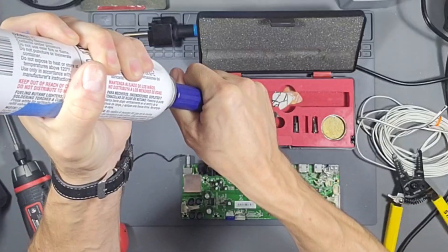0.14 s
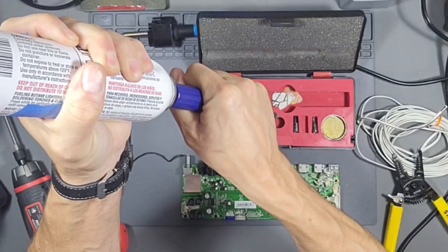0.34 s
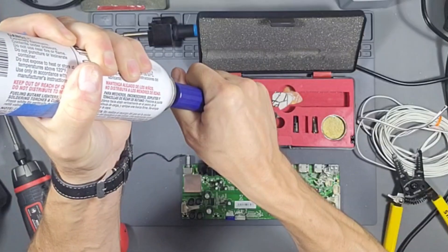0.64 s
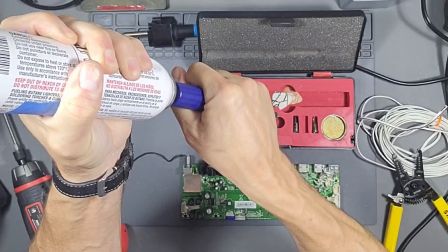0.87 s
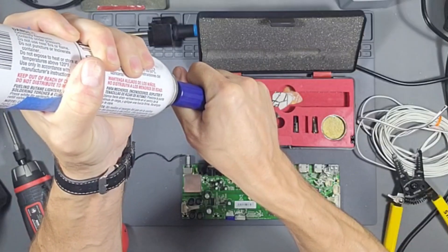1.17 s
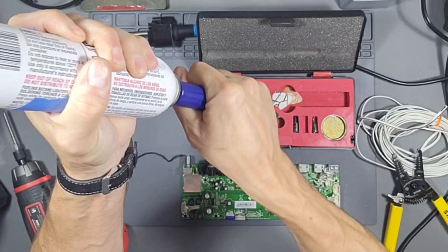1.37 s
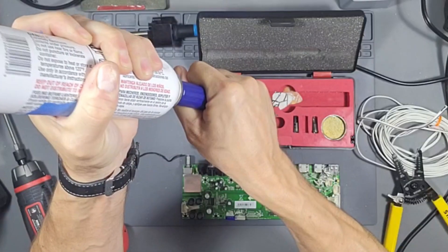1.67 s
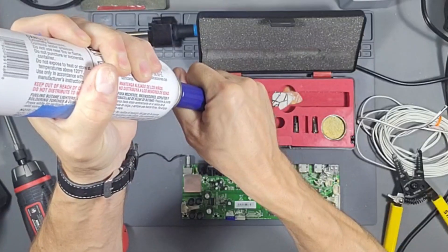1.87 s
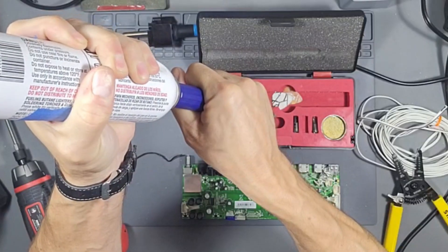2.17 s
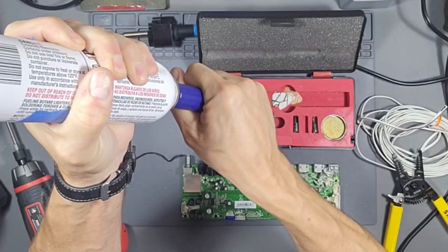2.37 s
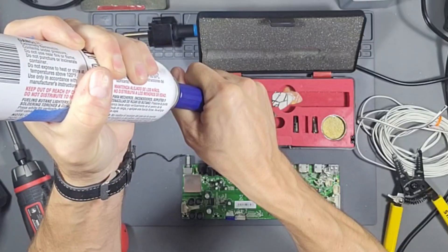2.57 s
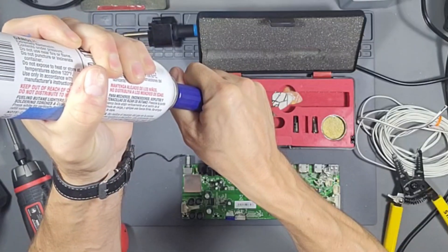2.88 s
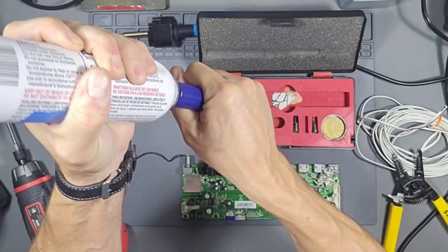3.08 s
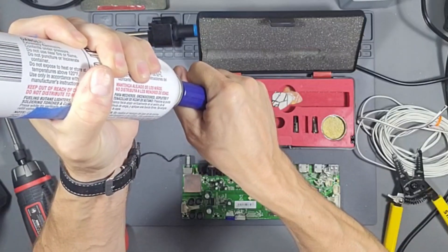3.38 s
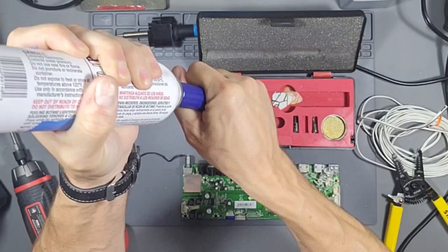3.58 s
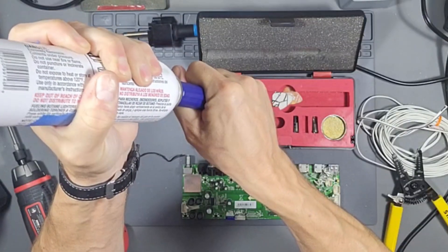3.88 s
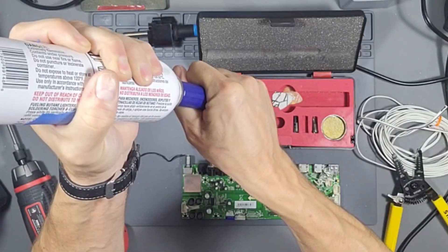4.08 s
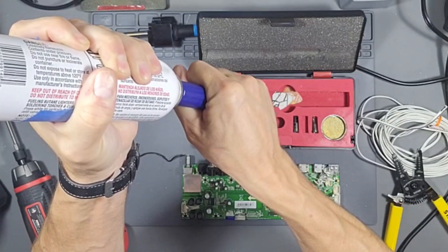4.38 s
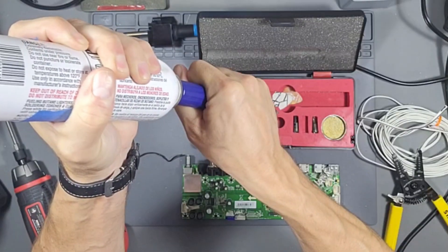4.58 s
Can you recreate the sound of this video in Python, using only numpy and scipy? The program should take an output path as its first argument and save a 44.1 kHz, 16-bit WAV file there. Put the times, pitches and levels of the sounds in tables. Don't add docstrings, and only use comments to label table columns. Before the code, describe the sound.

A bright, sizzling jet of gas fills the whole stretch, concentrated very high with little body, wavering in tone as the seal leaks more or less. Under it, faint low bumps from handling arrive irregularly, mostly after about two seconds, with another near the end. The indoor space is quiet and close with barely any echo, a weak low hum underneath, picked up in stereo by a nearby phone.

```python
import sys
import numpy as np
from scipy import signal
from scipy.fft import rfft, irfft, next_fast_len
from scipy.io import wavfile
from scipy.ndimage import uniform_filter1d, minimum_filter1d

SR = 44100
rng = np.random.default_rng(int(sys.argv[2]) if len(sys.argv) > 2 else 0)


def amplitude_ratio(level_db):
    exponent = np.asarray(level_db, float) / 20
    return 10 ** exponent


def master_out(mix):
    frames = np.transpose(np.atleast_2d(mix))
    ceiling = np.clip(frames, -1, 1)
    pcm = np.round(ceiling * 32767).astype(np.int16)
    wavfile.write(sys.argv[1], SR, pcm)


N = 209254
T = np.arange(N) / SR


def evened(x):
    return x / np.sqrt(np.mean(x ** 2) + 1e-20)


def read(points, hz):
    f, value = np.transpose(points)
    return np.interp(np.log(hz + 1), np.log(f + 1), value)


def humps(modes, hz):
    return np.sqrt(sum(amplitude_ratio(db) ** 2 / (1 + (2 * (hz - f) / width) ** 2) ** 2 for f, width, db in modes))


def patches(shape, bins, frames):
    field = uniform_filter1d(rng.standard_normal(shape), size=bins, axis=-2)
    return evened(uniform_filter1d(field, size=frames, axis=-1))


def ports(z, other, alike, lead=0):
    alike = np.clip(alike, 0, 1)
    left = alike * z * np.exp(1j * lead) + np.sqrt(1 - alike ** 2) * other
    return np.array([left, z])


def jet():
    # (time [s], flow [dB], leak past the seal [dB])
    flow_points = [(0, -3, 0), (0.06, -1.5, -1.5), (0.16, 0.5, 3), (0.45, 0.3, 1.5), (0.54, -1.5, 4),
                   (0.6, -1, 5.5), (0.85, 1, 5.5), (1.35, 2.5, 2.5), (1.385, 0.5, 1.3), (1.9, 0.7, -0.7),
                   (2.25, -0.5, 0), (2.9, -0.3, -0.4), (3.01, .3, 1.5), (3.1, -0.1, -0.5), (3.5, 0.9, -0.3),
                   (3.6, 0.4, -2.5), (4.2, 0.4, -2), (4.745, -0.2, -1.5)]
    # (low edge [Hz], high edge [Hz])
    bands_hz = [(8400, 10000), (10000, 13200), (13200, 15700), (1500, 8000)]
    # (level [dB], share of flow swings [dB/dB], share of leak swings [dB/dB])
    parts = [
        (-33, 1.5, 0.014),
        (-37.5, 0.49, 0.95),
        (-50.5, 0.35, 0.73),
        (-46.5, 0.31, 0.55),
    ]
    # (centre [Hz], width [Hz], level [dB])
    left_modes = [(1900, 900, -33), (2680, 900, -38), (3050, 250, -31), (3440, 900, -32), (4080, 330, -25),
                  (4430, 200, -21), (4740, 260, -20), (5350, 900, -24), (6080, 130, -28), (6440, 570, -28),
                  (7300, 460, -27), (8010, 190, -34), (8780, 420, -16), (9080, 310, -6), (9440, 380, -6),
                  (9750, 130, -6), (10070, 370, -4), (10330, 150, -7), (10640, 250, -9), (10920, 380, -10),
                  (11470, 480, -10), (11760, 150, -7), (12230, 900, -12), (12550, 120, -6),
                  (12630, 900, -13), (13530, 520, -23), (13970, 900, -25), (14680, 900, -27),
                  (15220, 320, -25), (15650, 530, -20)]
    # (centre [Hz], width [Hz], level [dB])
    right_modes = [(1230, 150, -33), (1620, 220, -30), (2150, 880, -24), (3030, 270, -30), (3420, 270, -32),
                   (3670, 160, -32), (4360, 730, -23), (4840, 210, -21), (5260, 720, -21), (6170, 900, -20),
                   (7300, 760, -15), (7950, 220, -19), (8300, 160, -15), (8750, 250, 1), (8940, 140, -2),
                   (9110, 150, 1), (9340, 470, 1), (9900, 400, -4), (10290, 220, -9), (10870, 680, -11),
                   (11590, 360, -12), (12010, 400, -14), (12310, 280, -15), (12570, 140, -17),
                   (12840, 490, -19), (13410, 750, -17), (14280, 470, -20), (14760, 260, -23),
                   (15190, 680, -27), (15610, 440, -23)]
    # (centre [Hz], width [Hz], level [dB])
    whistles = [(1960, 28, -18.5), (2150, 31, -20), (9400, 33, -47), (10700, 33, -10.5), (4400, 98, -21)]
    # (centre [Hz], width [Hz], level [dB])
    skirt = [(724, 430, -44), (1130, 92, -58)]
    # (frequency [Hz], phase [rad])
    lead_points = [(900, 0.4), (2000, 1.08), (2650, 1.73), (4000, -0.35), (4450, 1.6), (4850, -2.5),
                   (5200, -0.04), (7000, 1.3), (9000, -0.35), (10100, -2.5), (10850, 1.26), (11300, 3),
                   (13000, 4), (14500, 7)]
    # (frequency [Hz], share [0-1])
    alike_points = [(1000, .6), (2100, .8), (3500, .5), (5300, .8), (7800, .55), (8900, .92), (10500, .75),
                    (12000, .85), (15500, .6)]
    # (centre [Hz], width [Hz], lift [dB], end [s])
    grip = (10900, 220, 2.34, 3.1)
    sway_db_per_db = -0.25
    climb_db_per_khz_db = 0.77
    turn_rad_per_db = 0.12

    noise = rng.standard_normal((2, N + 1024))
    z, other = signal.stft(noise, SR, nperseg=1024, noverlap=768)[2]
    hz = np.fft.rfftfreq(1024, 1 / SR)
    t = np.arange(z.shape[1]) * 256 / SR
    s, flow_db, leak_db = np.transpose(flow_points)
    flow, leak = np.interp(t, s, flow_db), np.interp(t, s, leak_db)
    paths = np.array([humps(left_modes + skirt, hz), humps(right_modes + skirt + whistles, hz)])

    power = (paths ** 2).mean(0)
    share_db = [10 * np.log10(power[(hz > lo) & (hz < hi)].sum()) for lo, hi in bands_hz]
    swell = np.array([db + a * flow + b * leak - share for (db, a, b), share in zip(parts, share_db)])
    roar = swell[3].mean() + 1.11 * (swell[1] - swell[1].mean()) - 0.3
    swell = np.vstack([swell, roar])
    part = np.array([4, 3, 0, 1, 2])[np.searchsorted([2700, 8200, 10000, 13200], hz)]
    field = uniform_filter1d(swell[part], size=9, axis=0)

    grip_hz, grip_width_hz, grip_db, grip_end_s = grip
    grip_gain = grip_db / (1 + (2 * (hz - grip_hz) / grip_width_hz) ** 4)
    field += grip_gain[:, None] * np.sign(grip_end_s - t)
    slope_khz = np.clip((hz - 9300) / 1000, -0.8, 0.6) * (hz > 8200) * (hz < 10000)
    field += climb_db_per_khz_db * slope_khz[:, None] * leak
    tilt = sway_db_per_db * leak / 2 * np.array([1, -1])[:, None, None] * (hz > 8200)[:, None]

    drift = 1.0 * patches((2,) + z.shape, 2, 120)
    drift = drift + 2.2 * patches(z.shape, 3, 200) * (hz > 7000)[:, None]
    drift = drift + 1.3 * patches(z.shape, 14, 6)
    flicker = 0.14 * patches((1, len(t)), 1, 5)

    lead = read(lead_points, hz)[:, None] + turn_rad_per_db * leak * (hz > 11200)[:, None]
    z = ports(z, other, 0.84 * read(alike_points, hz)[:, None], lead) * paths[:, :, None]
    z = z * amplitude_ratio(field + tilt + drift + flicker + 26.5)
    return echoed(signal.istft(z, nperseg=1024, noverlap=768)[1][:, :N])


def echoed(x, t60_s=0.12, wet_db=-14):
    t = np.arange(SR // 8) / SR
    tail = rng.standard_normal((2, len(t))) * amplitude_ratio(-60 * t / t60_s) * (t > 0.003)
    tail *= amplitude_ratio(wet_db) / np.linalg.norm(tail, axis=1, keepdims=True)
    tail[:, 0] = 1
    return signal.fftconvolve(x, tail, axes=1)[:, :N]


def coloured(x, gain):
    size = next_fast_len(N)
    hz = np.fft.rfftfreq(size, 1 / SR)
    return evened(irfft(rfft(x, size) * gain(hz), size)[:N])


def jolts():
    # (start [s], shudder length [s], knock [dB], rattle [dB], thud [dB])
    events = [(-0.02, 0.036, -62, -57.5, -51.5), (1.205, 0.17, -64.5, -61.5, -58),
              (1.819, 0.086, -52.5, -68, -47.5), (1.912, .07, -68, -72, -54),
              (2.255, 0.072, -53.5, -63.5, -57), (2.342, 0.055, -63, -67, -50.5),
              (2.666, 0.11, -55, -71, -48.5), (2.969, 0.21, -51.5, -67, -41.5),
              (3.261, 0.1, -50.5, -63.5, -43), (3.348, 0.061, -55, -76, -48),
              (3.493, 0.079, -65, -87, -53.5), (3.831, 0.087, -54.5, -63, -50),
              (3.914, .1, -59, -71.5, -49.5), (4.618, .07, -48, -61, -41.5), (4.705, .05, -54, -69, -48)]
    # (centre [Hz], width [Hz], level [dB])
    knock_modes = [(168, 56, -3.5), (253, 63, 1), (306, 110, -6)]
    # (centre [Hz], width [Hz], level [dB])
    rattle_modes = [(429, 75, -2.5), (528, 65, -1.5), (710, 270, -14)]
    # (centre [Hz], width [Hz], level [dB])
    thud_modes = [(61.2, 14, 6), (88, 40, -1), (107.7, 16, -11.5)]
    # (delay [s], sag while shaken [dB/s], fade after [dB/s])
    settle = [
        (0.001, 60, 216),
        (0.01, 54, 260),
        (0.018, 38, 111),
    ]
    rise_s = 0.022

    shake = rng.standard_normal(N)
    rings = [coloured(shake, lambda hz: humps(modes, hz)) for modes in (knock_modes, rattle_modes, thud_modes)]
    rings = [evened(x / np.sqrt(uniform_filter1d(x ** 2, size=1300) + 0.22)) for x in rings]
    out = np.zeros(N)
    for start, length, *level_db in events:
        for db, (delay, sag_db, fade_db), ring in zip(level_db, settle, rings):
            t = T - start - delay
            rise = np.clip(t / rise_s, 0, 1) ** 2
            fall_db = sag_db * np.clip(t, 0, length) + fade_db * np.maximum(t - length, 0)
            out += rise * amplitude_ratio(db - fall_db) * ring
    return out


def room():
    # (frequency [Hz], density [dB per Hz])
    rumble = [(20, -26), (45, -6.5), (70, -2), (90, -6), (118, -9), (140, -21), (210, -23), (300, -24.5),
              (450, -26), (900, -39), (1500, -81), (2500, -51)]
    level_db = -58.5
    return amplitude_ratio(level_db) * coloured(rng.standard_normal(N), lambda hz: amplitude_ratio(read(rumble, hz)))


def low(x, other):
    # (frequency [Hz], share [0-1])
    alike_points = [(60, .998), (100, .985), (160, .8), (250, .8), (500, .55), (1200, .4)]
    # (frequency [Hz], left-right balance [dB])
    balance_points = [(60, 0), (125, -1), (250, -6.5), (500, 0.5), (1200, -16.5)]
    size = next_fast_len(N)
    hz = np.fft.rfftfreq(size, 1 / SR)
    half_db = read(balance_points, hz) / 2
    z = ports(rfft(x, size), rfft(other, size), read(alike_points, hz))
    return irfft(z * amplitude_ratio(np.array([half_db, -half_db])), size)[:, :N]


def hum():
    # (frequency [Hz], rms level [dB], left-right balance [dB])
    tones = [(60.3, -56.5, 1), (240, -78.5, -18.5), (469, -86, 10)]
    waver = uniform_filter1d(rng.standard_normal(N), size=6000)
    waver = evened(uniform_filter1d(waver, size=6000))
    out = np.zeros((2, N))
    for hz, db, pan_db in tones:
        level_db = db + 0.49 * waver + np.array([[pan_db], [-pan_db]]) / 2
        out += np.sqrt(2) * amplitude_ratio(level_db) * np.sin(2 * np.pi * hz * T)
    return out


def masked(x):
    # (frequency [Hz], density [dB per Hz])
    mask_points = [(1800, -112), (2500, -102), (2900, -101), (3300, -99), (3880, -97), (4300, -95),
                   (5200, -94), (6000, -97), (7000, -99), (8000, -98), (8400, -92), (9000, -92),
                   (13000, -92), (14500, -96), (15700, -94)]
    spot_db = 1.5
    window = np.sin(np.pi * (np.arange(2048) + 0.5) / 2048)
    hz, _, z = signal.stft(x, SR, window, nperseg=2048, noverlap=1024, scaling="psd")
    power = 2 * abs(z) ** 2 + 1e-20
    loud_db = uniform_filter1d(10 * np.log10(power.sum((0, 1))), size=5)
    mask_db = read(mask_points, hz)[:, None] + 0.6 * (loud_db - loud_db.mean())
    mask = amplitude_ratio(mask_db + 2.4 * patches(z.shape[1:], 8, 1)) ** 2
    nearby = uniform_filter1d(uniform_filter1d(power.mean(0), size=5, axis=0), size=2, axis=1)
    spots = (nearby > mask * amplitude_ratio(spot_db) ** 2) * 1.0
    spots = minimum_filter1d(minimum_filter1d(spots, size=3, axis=0), size=2, axis=1, origin=-1)
    z = z * spots * (power > mask)
    return signal.istft(z, SR, window, nperseg=2048, noverlap=1024, scaling="psd")[1][:, :N]


def scene():
    return jet() + low(jolts() + room(), jolts() + room()) + hum()


def low_pass(x):
    return signal.sosfilt(signal.butter(12, 16040, fs=SR, output="sos"), x)


def record(dry):
    edge = signal.firwin(1023, 15740, window=("kaiser", 9), fs=SR)
    mix = masked(signal.oaconvolve(dry, edge[None], "same", axes=1))
    return low_pass(mix)


dry = scene()
out = record(dry)
master_out(out)
```